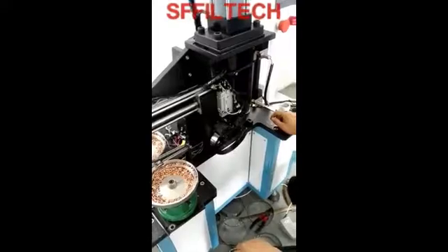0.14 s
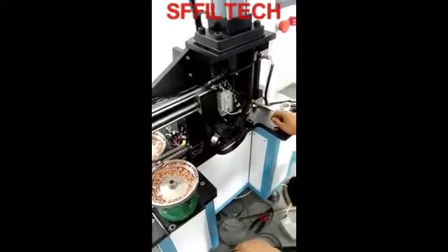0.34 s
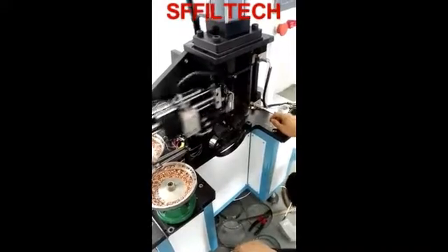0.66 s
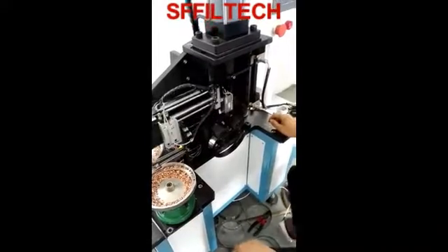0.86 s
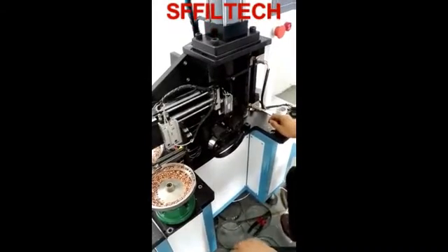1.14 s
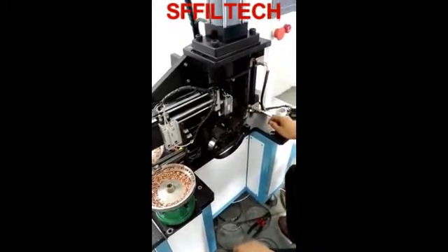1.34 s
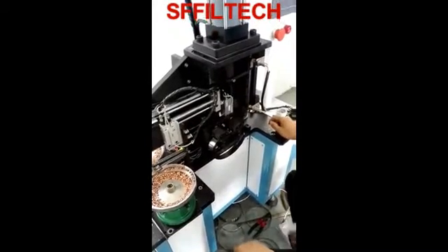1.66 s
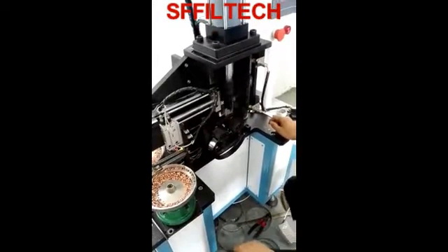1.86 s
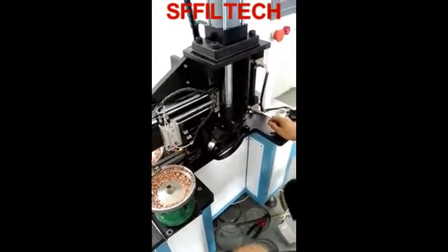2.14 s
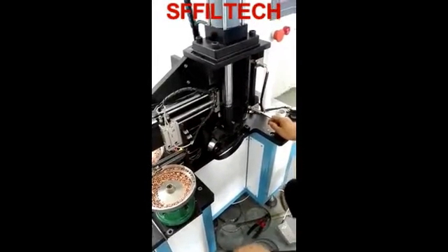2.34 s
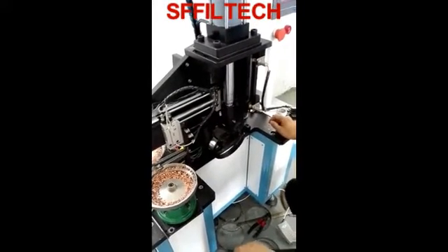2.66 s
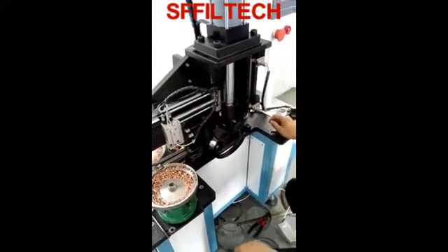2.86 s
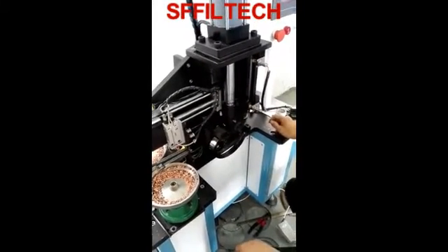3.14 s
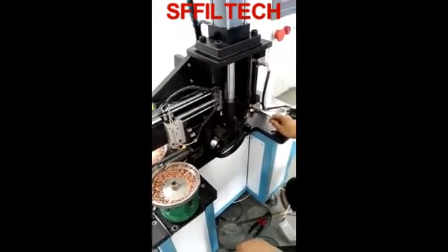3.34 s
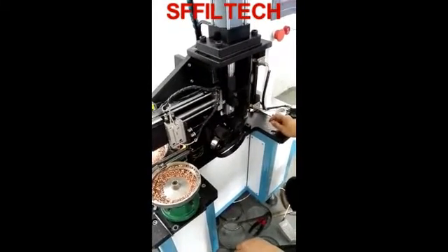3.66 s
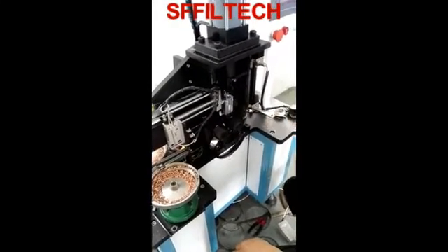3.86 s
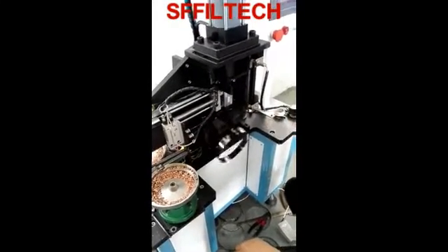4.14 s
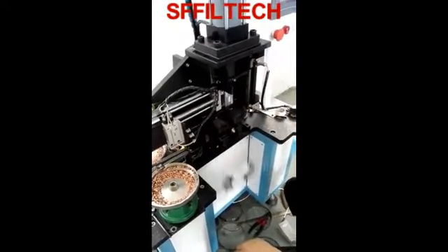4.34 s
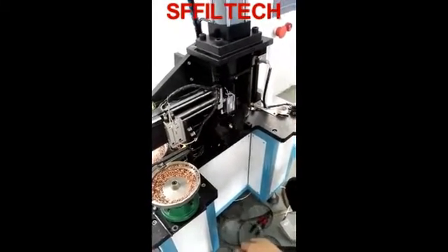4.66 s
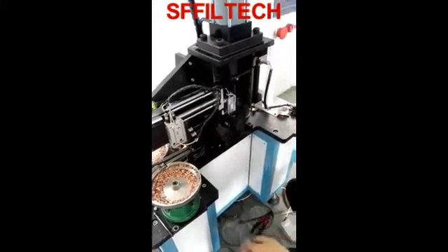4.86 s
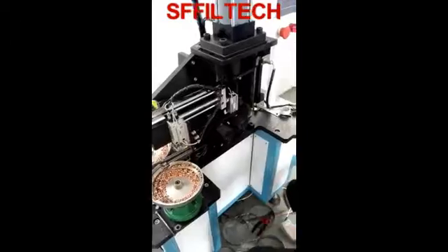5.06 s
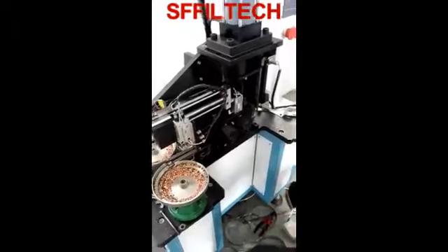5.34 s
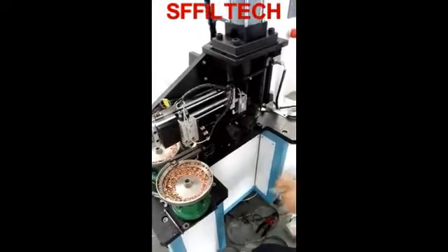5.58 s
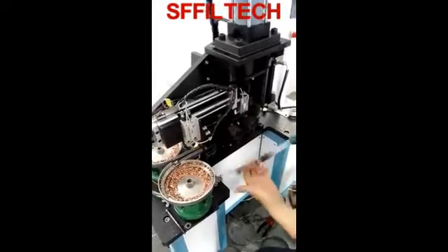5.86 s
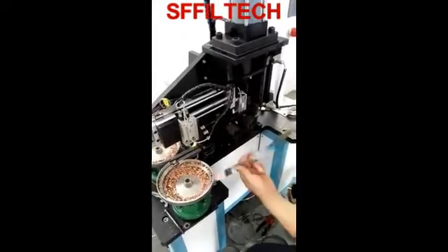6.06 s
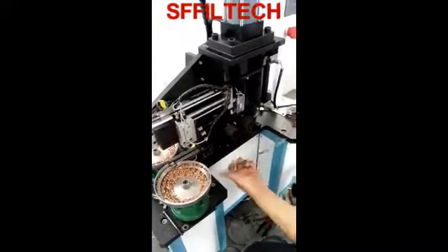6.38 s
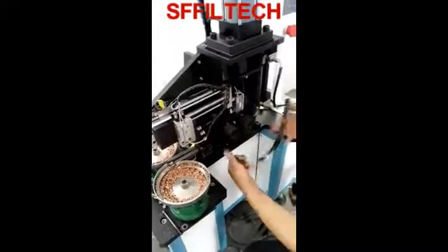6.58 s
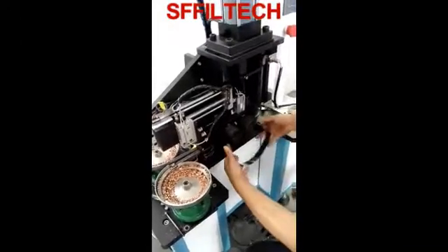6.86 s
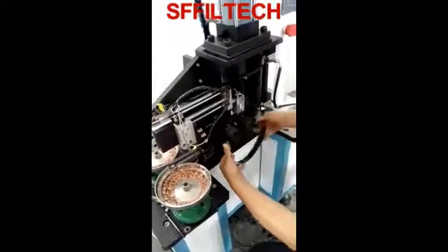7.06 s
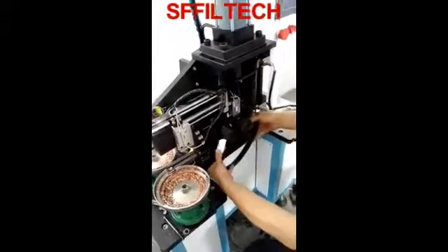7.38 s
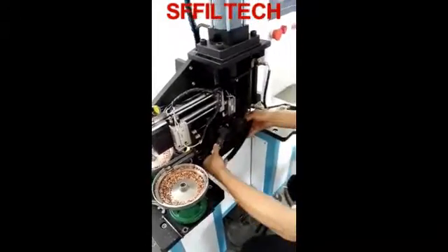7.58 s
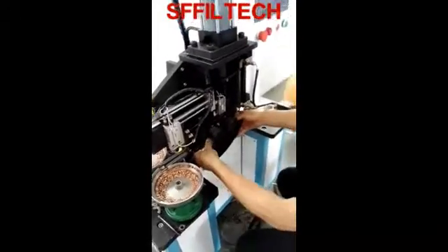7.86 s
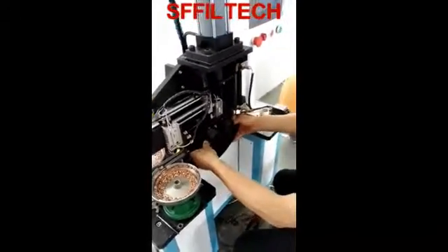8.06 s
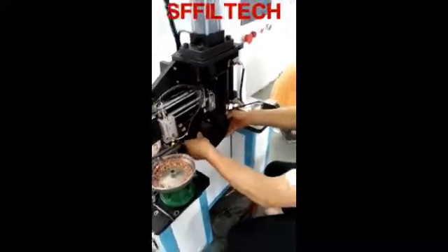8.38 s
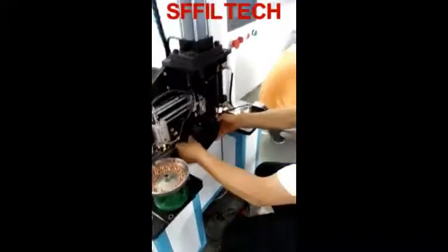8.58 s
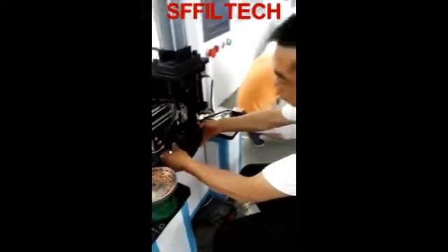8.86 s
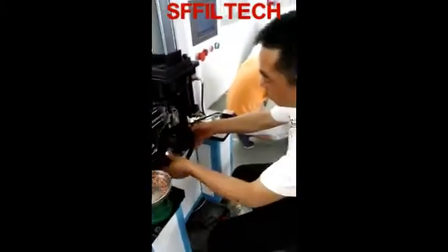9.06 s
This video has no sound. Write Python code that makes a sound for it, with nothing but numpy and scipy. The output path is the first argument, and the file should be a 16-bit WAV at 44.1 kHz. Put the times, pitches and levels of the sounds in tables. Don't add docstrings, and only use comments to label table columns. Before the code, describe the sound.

A phone a step from a pneumatic press picks up a reverberant factory hall with a broad motor drone and faint fan whine. At 0 s a vent is already hissing, cut off quickly, with soft thuds to 0.4. A metal knock lands at 1.0, relay ticks at 1.45 and 1.73, then a half-second air hiss. At 2.33 the ram clacks very hard, the frame booming under a shorter vent. A faint blow at 2.8 precedes a loud, clipping steel strike at 3.3; further rattling blows follow at 3.7, 4.1 and roughly every quarter second until 6.5, gradually softer, each trailing into the hall. The drone drops near 3.9. Air puffs and a clack come around 4.9-5.4, a bright puff at 6.27. A cluster rattles at 7.1, heavier low-ringing blows hit at 7.5 and 8.0, then faint taps from 8.7 to 9.2.

```python
import sys
import numpy as np
from scipy import signal
from scipy.fft import rfft, irfft, next_fast_len
from scipy.io import wavfile
from scipy.ndimage import uniform_filter1d

SR = 44100
rng = np.random.default_rng(int(sys.argv[2]) if len(sys.argv) > 2 else 0)


def file_out(sig):
    cols = np.atleast_2d(sig).T
    lim = np.clip(cols, -1, 1)
    pcm = np.round(lim * 32767).astype(np.int16)
    wavfile.write(sys.argv[1], SR, pcm)


def volts(x):
    e = np.asarray(x, float) / 20
    return 10 ** e


N = 406602
TIME = np.arange(N) / SR


def on_log(hz, table):
    at, value = np.transpose(table)
    return np.interp(np.log(np.maximum(hz, 1)), np.log(at), value)


def octaves(f, hz):
    return np.log2(np.maximum(f, 1) / hz)


def bump(f, hz, width, rise_db):
    return rise_db / (1 + (2 * (f - hz) / width) ** 2)


def colour(x, db_at):
    size = next_fast_len(x.shape[-1])
    gain = volts(db_at(np.arange(size // 2 + 1) * SR / size)).astype(np.float32)
    return irfft(rfft(x.astype(np.float32), size) * gain, size)[..., :x.shape[-1]].astype(float)


def unit(x):
    return x / np.sqrt(np.mean(x ** 2))


def stereo_noise(size):
    return rng.standard_normal((2, size))


def walk(rate, size=N):
    k = int(SR / rate)
    return 1.52 * uniform_filter1d(np.repeat(rng.standard_normal(size // k + 1), k), k)[:size]


def add(track, s, x):
    i = int(s * SR)
    track[:, i:i + x.shape[-1]] += x[..., :N - i]


# start in seconds, peak level [dB], low mode [Hz], high mode [Hz],
# low over high mode [dB], length [s].
CLACKS = [
    (0.994, -18.5, 2010, 4640, -8, 0.0041),
    (2.326, 0.5, 2210, 4350, -6.5, 0.0039),
    (4.968, -15.5, 1950, 4080, 0, 0.0045),
    (7.1203, -20, 2200, 5000, -4, 0.003),
]
# centre [Hz], width [Hz], level [dB].
CLACK_GAP = (3200, 1100, -16)


def clacks():
    out, t = np.zeros((2, N)), TIME[:SR // 10]
    for s, peak_db, low_hz, high_hz, lean_db, length in CLACKS:
        noise = colour(stereo_noise(len(t)), lambda f: bump(f, *CLACK_GAP))
        low = unit(colour(noise, lambda f: bump(f, low_hz, 1900, 32)))
        high = unit(colour(noise, lambda f: bump(f, high_hz, 1700, 16) - 10 * (f < 3000)))
        crack = volts(lean_db) * low * np.exp(-t / (2 * length)) + high * np.exp(-t / length)
        add(out, s, volts(peak_db - 3) * crack * np.minimum(t / 0.003, 1) ** 2)
    return out


# start in seconds, peak level [dB], pitch [Hz], time to fade 60 dB [s].
THUDS = [
    (0.043, -36.5, 81, 0.17),
    (0.361, -35.5, 85, 0.11),
    (0.372, -41, 260, 0.048),
    (1.752, -26.5, 95, 0.038),
    (4.199, -32.5, 196, 0.068),
    (4.3, -41.5, 129, 0.22),
    (4.845, -39, 74, 0.076),
    (5.423, -40, 150, 0.076),
    (7.337, -48.5, 88, 0.14),
    (8.01, -42, 65, 0.087),
]
# start in seconds, peak level [dB], pitch [Hz],
# time to fade 60 dB [s].
BOOMS = [
    (0.998, -30.5, 128, 0.46),
    (2.329, -28, 123, 0.96),
]


def knocks():
    out, t = np.zeros((2, N)), TIME[:SR]
    for s, peak_db, hz, t60 in THUDS:
        fade = np.minimum(t / 0.0026, 1) * volts(-60 * t / t60)
        add(out, s, volts(peak_db + 4.5) * fade * np.sin(2 * np.pi * hz * t))
    for s, peak_db, hz, t60 in BOOMS:
        width_hz = 125
        frame = colour(rng.standard_normal(SR), lambda f: np.maximum(
            bump(f, hz, width_hz, 39.6), bump(f, 1.67 * hz, width_hz, 36.6)))
        first = 2.1 * np.sin(2 * np.pi * hz * t) * np.exp(-t / 0.013)
        boom = unit(frame) * volts(-60 * t / t60) + first
        add(out, s, volts(peak_db - 4) * np.minimum(t / 0.0071, 1) * boom)
    return out


# start in seconds, peak level [dB], pitch [Hz], time to fade 60 dB [s].
TICKS = [
    (1.447, -16, 953, 0.034),
    (1.735, -12, 994, 0.02),
]


def ticks():
    out, t = np.zeros((2, N)), TIME[:SR // 10]
    for s, peak_db, hz, t60 in TICKS:
        fade = np.minimum(t / 0.0028, 1) * volts(-60 * t / t60)
        add(out, s, volts(peak_db - 0.5) * fade * np.sin(2 * np.pi * hz * t))
    return out


# start in seconds, hiss level [dB], open time [s], body below 8 kHz over hiss [dB],
# body tilt toward treble [dB].
VENTS = [
    (0.0, -29.5, 0.089, -1, 2),
    (1.732, -44, 0.016, 2, -3),
    (1.759, -34.5, 0.53, 3, -1.5),
    (2.335, -38, 0.22, 1, -1),
    (4.245, -49, .03, -5.5, 2),
    (4.936, -36, 0.17, -5.5, 4.5),
    (5.16, -42, 0.055, -7, 1),
    (5.222, -41.5, 0.051, -8, -3),
    (5.322, -41, 0.039, -12, -1),
    (6.272, -36, 0.081, 0, 11),
]
# frequency [Hz], level [dB].
JET = [(300, -27), (1000, -18), (2200, -6.5), (3100, -12), (4000, -6), (5500, -9), (7000, -12.5),
       (10500, 5), (14000, 4.5)]


def air():
    puff_db, puff_s, sag_db, shut_db_per_s = 11.5, 0.21, 6, 220
    wide_port, narrow_port, dull, keen = np.zeros((4, 1, N))
    t = TIME[:SR]
    for s, hiss_db, open_s, body_db, tilt_db in VENTS:
        gain_db = hiss_db + puff_db * np.exp(-t / puff_s) - sag_db * t / open_s
        gain_db = gain_db - shut_db_per_s * np.maximum(t - open_s, 0)
        rise_s = 0.0012 + 0.025 * open_s
        gain = volts(gain_db) * (1 - np.exp(-t / rise_s))
        add(narrow_port if body_db < -5 else wide_port, s, gain)
        add(dull, s, gain * volts(body_db - tilt_db))
        add(keen, s, gain * volts(body_db + tilt_db))
    jet = colour(stereo_noise(N), lambda f: on_log(f, JET))
    body = colour(jet, lambda f: np.where(f < 8500, 0, -100))
    low = colour(jet, lambda f: np.where(f < 3300, 0, -100))
    top = jet - body
    nozzle = unit(colour(top, lambda f: bump(f, 10500, 3200, 10)))
    hiss = unit(top) * wide_port + nozzle * narrow_port
    full = (low * dull + (body - low) * keen) / np.std(body)
    return hiss * volts(1.26 * walk(40)) + full * volts(1.4 * walk(30.06))


# start in seconds, peak level [dB], rattle length [s], ring [Hz],
# brightness above 9 kHz [dB].
BLOWS = [(2.8383, -29.5, 0.034, 4120, -27), (3.319, 0, 0.031, 4130, -22.5), (3.707, -6, 0.025, 4430, -25),
         (4.087, -11, 0.028, 4200, -23), (4.424, -13.5, 0.03, 6100, -24), (4.7054, -15.5, 0.033, 6040, -18),
         (4.9857, -14, 0.029, 4270, -19), (5.254, -17.5, 0.03, 4230, -23.5), (5.5127, -17, 0.03, 3730, -24),
         (5.786, -18, 0.03, 3680, -26), (6.053, -13.5, 0.026, 3860, -26), (6.27, -20, 0.029, 5400, -13.5),
         (6.3053, -16, 0.076, 3570, -21.5), (6.527, -18.5, 0.026, 3700, -26),
         (7.093, -26.5, 0.04, 4100, -21), (7.1136, -16.5, 0.026, 4500, -23),
         (7.189, -22.5, 0.096, 4440, -22), (7.477, -6.5, 0.044, 1900, -26),
         (8.0052, -8.5, 0.035, 1770, -26), (8.731, -34.5, 0.023, 4600, -28), (8.758, -32, 0.03, 5700, -26)]
# frequency [Hz], level [dB].
STEEL = [(130, -25), (290, -13.5), (600, -19.5), (1000, -9), (1300, -8), (1600, 2), (2000, 2.5),
         (2600, 2.5), (3300, 0), (4400, 3.5), (6000, 1.5), (7400, -3.5), (10000, 4.5), (14000, 0)]
# frequency [Hz], width [Hz], level [dB] (not used).
SHEET = [(953, 110, -7), (1460, 23, -3), (2010, 140, -2), (2540, 220, -2), (2860, 200, -2), (2860, 320, -3),
         (3190, 31, -7), (4100, 16, -5), (4390, 480, 0), (5240, 16, -3), (5400, 310, -5), (5670, 270, -5),
         (7450, 10, -8), (7050, 25, -9)]


def blows():
    near, far, t = np.zeros((2, N)), np.zeros((2, N)), TIME[:SR // 6]
    for s, peak_db, length, ring_hz, top_db in BLOWS:
        heavy = max(peak_db + 11.5, 0)
        deep = ring_hz < 2500
        bass_db = 9.5 + 0.06 * heavy + 2.5 * deep
        tilt = [(900, bass_db), (1600, 1.5), (3000, 1.5), (3800, 0), (7500, 0), (9500, top_db + 12.5)]
        rise_s = 0.0067 if deep else 0.0032
        stop = np.maximum(t - length, 0) / (0.76 * length)
        shape = (1 - np.exp(-t / rise_s)) * np.exp(-t / 0.05 - stop)
        shape = volts(peak_db) * shape * volts(1.5 * walk(265, size=len(t)))
        broad = colour(stereo_noise(len(t)), lambda f: on_log(f, STEEL) + on_log(f, tilt))
        struck = rng.uniform(0, 1, len(SHEET))

        def modes(f):
            sheet = sum(bump(f, hz, 1.23 * width, 5 * share)
                        for (hz, width, _), share in zip(SHEET, struck))
            return sheet + bump(f, ring_hz, 410, 5.7)
        add(near, s - 0.001, unit(colour(broad, modes)) * shape)
        add(far, s, unit(broad) * shape * volts(-3 - 0.34 * heavy))
    return near, far


# start in seconds, peak level [dB], centre [Hz].
TAPS = [(0.37, -28, 440), (0.986, -20, 1530), (0.994, -26, 450), (0.999, -21, 1590), (1.027, -40, 1630),
        (4.2, -32, 1940), (4.249, -30, 5300), (4.306, -28, 3400), (4.31, -22.5, 1590), (4.332, -24, 1410),
        (4.348, -33, 1240), (5.333, -36, 4390), (5.42, -20.5, 1510), (5.44, -25, 1800),
        (7.202, -28.5, 1000), (7.279, -30, 2620), (7.356, -30, 3970), (7.369, -30.5, 2080),
        (8.733, -32.5, 1000), (8.76, -31.5, 900), (8.889, -34.5, 3300), (9.169, -38.5, 5740)]


def taps():
    out, t = np.zeros((2, N)), TIME[:SR // 10]
    for s, peak_db, hz in TAPS:
        noise = unit(colour(stereo_noise(len(t)), lambda f: -9 * (octaves(f, hz) / 0.85) ** 2))
        shape = np.minimum(t / 0.0026, 1) * np.exp(-(t / 0.012) ** 2 / 2)
        grain = volts(2 * walk(350, size=len(t)))
        add(out, s, volts(peak_db - 5) * noise * shape * grain)
    return out


# frequency [Hz], time to fade 60 dB [s].
HALL_T60 = [(200, 1), (600, 0.77), (1500, 0.65), (4000, 0.71), (10000, 0.55)]


def hall(x):
    t, tail = TIME[:SR], 0
    for hz in 63 * 2. ** np.arange(9):
        band = colour(stereo_noise(SR), lambda f: -12 * octaves(f, hz) ** 2)
        bass_db = -7 * (hz < 300)
        tail = tail + band * volts(bass_db - 60 * t / on_log(hz, HALL_T60))
    tail = unit(tail * (1 - np.exp(-t / 0.0019))) / np.sqrt(SR)
    return signal.oaconvolve(x, tail, axes=1)[:, :N]


# frequency [Hz], width [Hz], level [dB].
FANS = [
    (990, 200, -60),
    (2580, 510, -46),
    (1900, 400, -55),
]


def fans():
    whines = []
    for hz, width, level_db in FANS:
        band = unit(colour(stereo_noise(N), lambda f: bump(f, hz, width, 22)))
        whines.append(band * volts(level_db + 2 * walk(4.6)))
    low, upper_fan, mid_fan = whines
    strain_db = 5.5 * np.exp(-((TIME - 6.85) / 0.3) ** 2) - 1.5
    return low + upper_fan * volts(strain_db) + mid_fan


# time in seconds, level [dB].
DRONE = [(0.0, -30.5), (1.6, -32.5), (2.2, -34), (2.77, -36), (3.2, -34), (3.9, -41), (5.5, -42),
         (7.0, -42), (8.3, -43.5), (9.22, -47)]
# frequency [Hz], level [dB].
MOTORS = [(30, -21.5), (65, -2.5), (130, -1), (300, -4.5), (600, -1.5), (1000, -1.5), (2000, -3.5),
          (3800, -7), (4300, -8), (7200, -14), (10000, -17.5), (14000, -17)]
# frequency [Hz], width [Hz], level [dB] (not used).
MOTOR_RINGS = [(980, 180, 0), (2200, 210, -3), (3800, 300, 0)]


def drone():
    step = 32
    level_db = np.interp(TIME[::step], *np.transpose(DRONE))
    eased = DRONE[0][1] - level_db
    bass_db, hiss_db = -4 - 0.096 * eased, -3.5 + 0.64 * eased

    def motor_colour(f):
        return on_log(f, MOTORS) + sum(bump(f, hz, width, 2.6) for hz, width, _ in MOTOR_RINGS)
    noise = unit(colour(stereo_noise(N), motor_colour))
    swell = walk(2.11 * step, size=len(level_db))
    size = next_fast_len(N)
    spectrum, hz = rfft(noise.astype(np.float32), size), np.arange(size // 2 + 1) * SR / size
    out = 0
    for centre in 32 * 2 ** np.arange(0, 9.5, .5):
        share = np.clip(1 - 2 * np.abs(octaves(hz, centre)), 0, 1).astype(np.float32)
        lean_db = bass_db * np.clip(np.log2(700 / centre) / 2, 0, 1)
        lean_db = lean_db + hiss_db * np.clip(np.log2(centre / 2500), 0, 1)
        flicker_db = 0.1 * swell + 0.73 * walk(9.9 * step, size=len(level_db))
        gain = np.repeat(volts(level_db + 1.5 + lean_db + flicker_db), step)[:N]
        out = out + irfft(spectrum * share, size)[:, :N] * gain
    return out


# frequency [Hz], shared part [0-1].
ALIKE = [(60, .999), (250, .975), (500, .85), (1000, .3), (4000, .25), (12000, .38)]
# frequency [Hz], left minus right [dB].
LEFT_DB = [(60, 1), (110, -1), (200, 1), (370, -1.5), (680, -3), (1250, -3), (2310, -1.5), (4230, -0.5),
           (7780, -4), (14300, 1.5)]
# frequency [Hz], share of the full lag [0-1.21].
LAG_SHARE = [(60, 0.15), (200, 0.28), (340, 0.87), (600, 1.21), (1000, 0.999)]


def ports(mix):
    lag_samples = 26
    size = next_fast_len(N)
    right, other = rfft(mix, size)
    hz = np.arange(size // 2 + 1) * SR / size
    alike = np.clip(on_log(hz, ALIKE), 0, 1)
    left = alike * right + np.sqrt(1 - alike ** 2) * other
    left = left * np.exp(-2j * np.pi * hz * on_log(hz, LAG_SHARE) * lag_samples / SR)
    lean = volts(on_log(hz, LEFT_DB) / 2)
    return irfft(np.array([left * lean, right / lean]), size)[:, :N]


def scene():
    near, far = blows()
    clack, tap, knock = clacks(), taps(), knocks()
    wet = hall(far + volts(-6.5) * clack + volts(-11.5) * tap + volts(-1.5) * knock)
    mix = near + clack + tap + knock + wet + air() + drone() + fans()
    return ports(mix) + ticks()


def patchy_top(x, depth_db=0.5):
    hz, _, frames = signal.stft(x, SR, nperseg=512)
    strips = rng.exponential(1, (len(hz) // 3 + 1, frames.shape[2] // 6 + 1)) ** 3.5
    strips = np.repeat(np.repeat(strips, 3, axis=0), 6, axis=1)
    loss_db = strips[:len(hz), :frames.shape[2]] * depth_db
    treble = (hz > 7000)[:, None]
    return signal.istft(frames * volts((1 - loss_db) * treble), SR, nperseg=512)[1][:, :N]


def roll_off(x):
    return signal.sosfilt(signal.butter(12, 14890, fs=SR, output="sos"), x)


# frequency [Hz], level [dB].
GAP = [(7550, 0), (7950, -70), (9050, -70), (9650, 0), (14200, 0), (14700, -70)]


def record(dry):
    knee = 2.77
    rounded = knee * np.tanh(dry / knee)
    gapped = colour(patchy_top(rounded), lambda f: on_log(f, GAP))
    return roll_off(np.clip(gapped + 0.002, -1, 1))


dry = scene()
out = record(dry)
file_out(out)
```